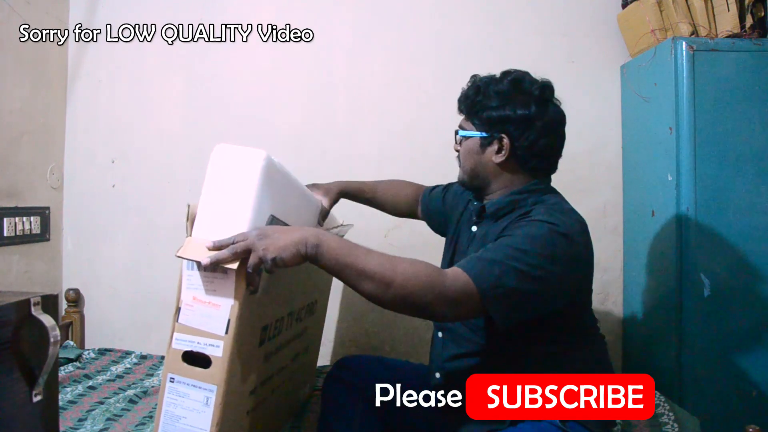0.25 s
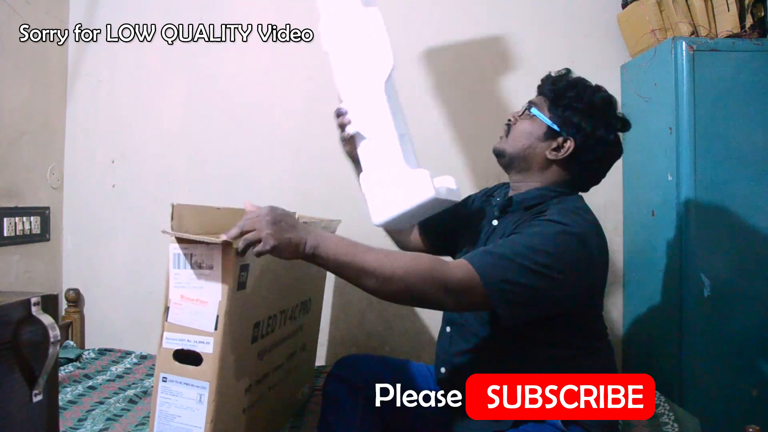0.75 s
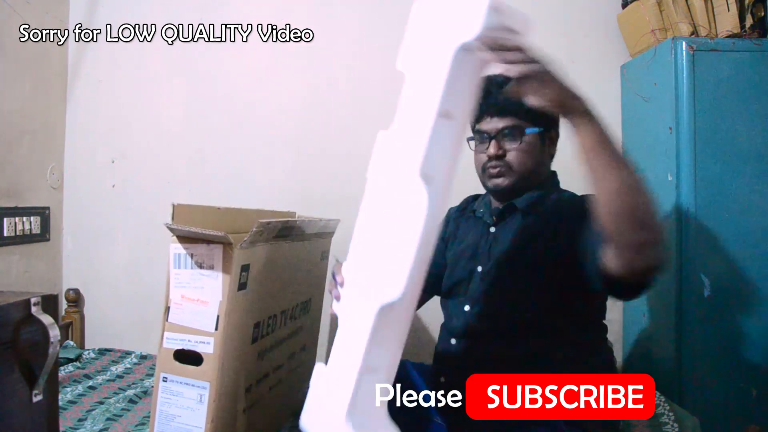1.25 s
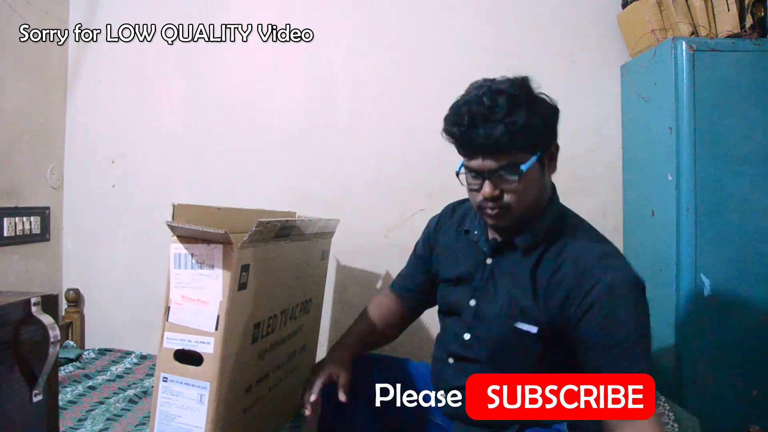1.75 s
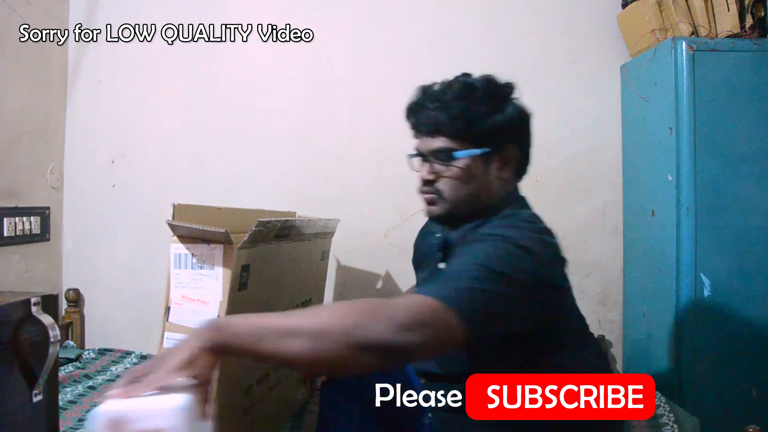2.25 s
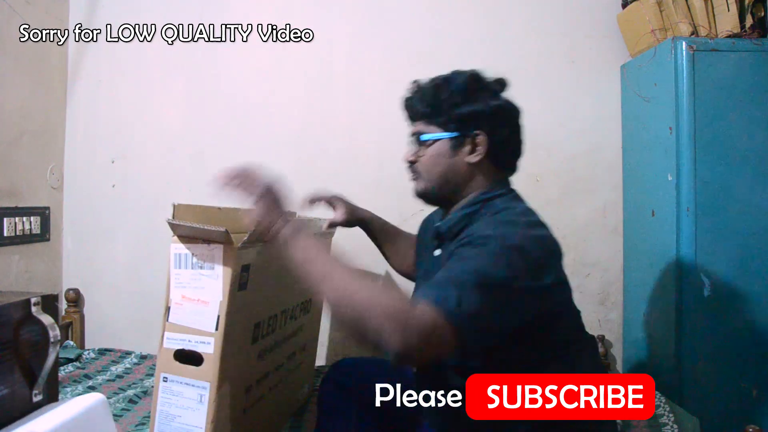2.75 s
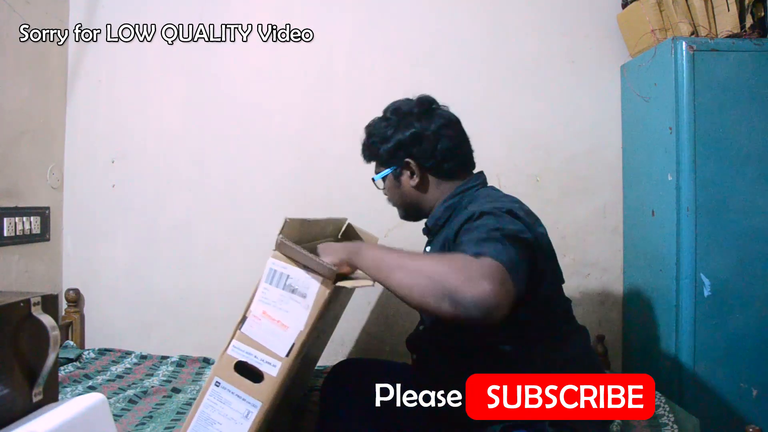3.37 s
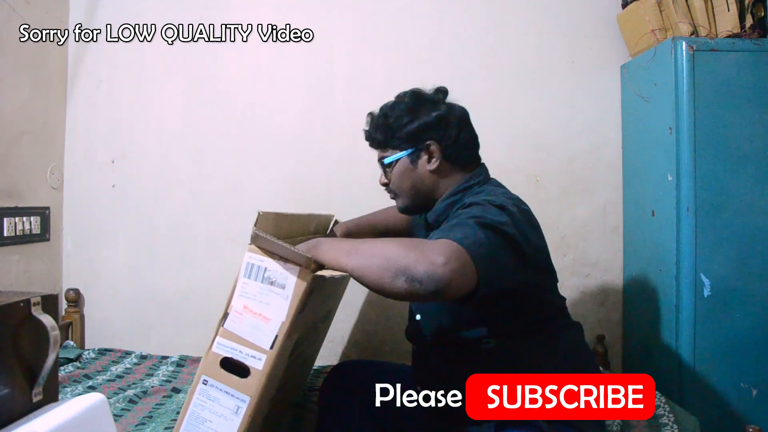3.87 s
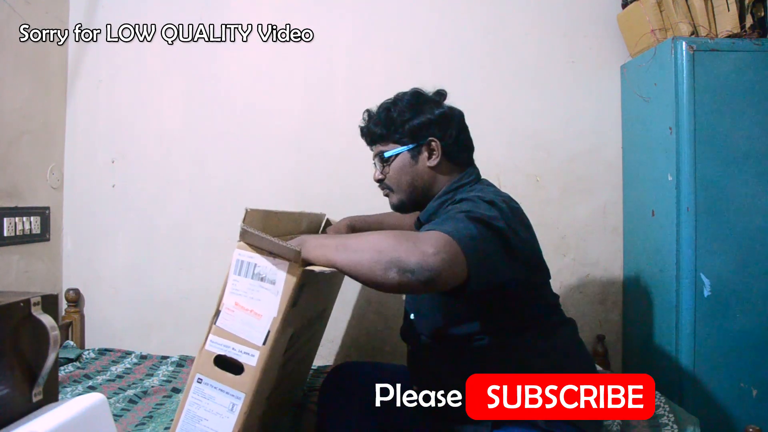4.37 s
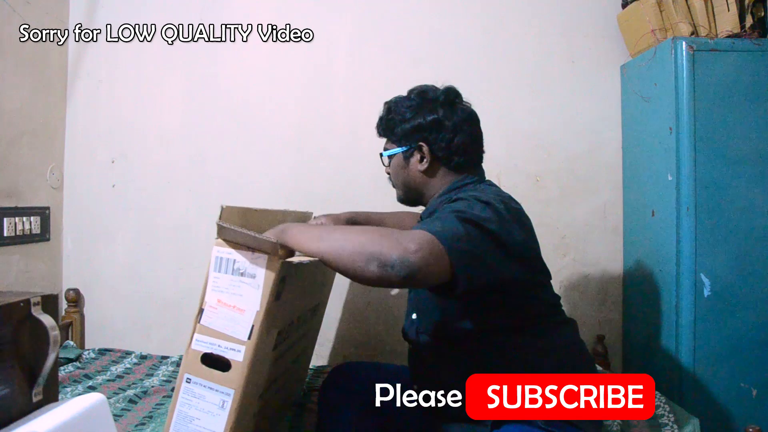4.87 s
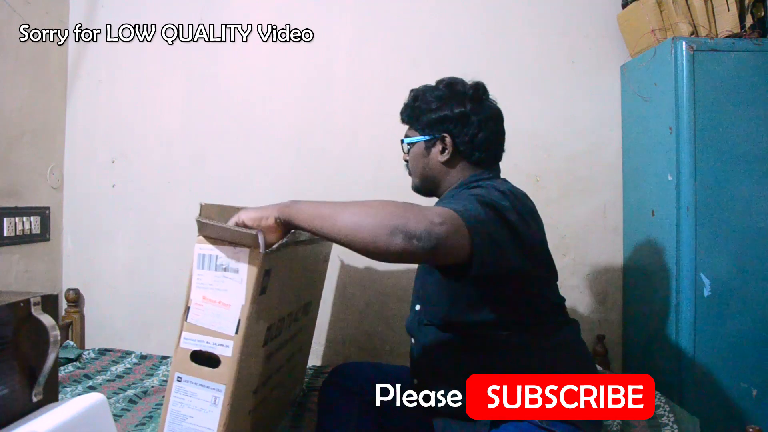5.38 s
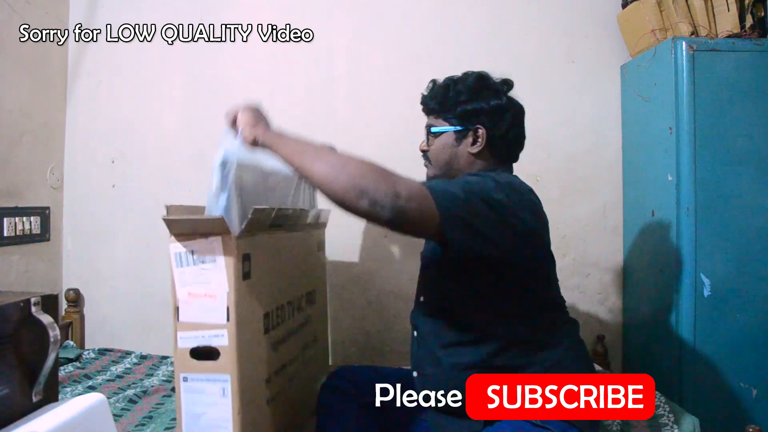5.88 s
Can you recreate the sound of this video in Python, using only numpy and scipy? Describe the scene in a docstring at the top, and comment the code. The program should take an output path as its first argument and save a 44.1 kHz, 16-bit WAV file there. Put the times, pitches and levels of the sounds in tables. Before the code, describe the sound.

Nearby microphone, short indoor reverberation, faint room air. First come grainy foam slides with light, woody-sounding knocks, a squeal of skin on foam, and one explosive crack that distorts. After a final foam knock, cardboard flaps brush and click sparsely. Then packing sheet is crumpled and pulled in overlapping, crisp swishes over dull carton bumps, easing off as the box drops softly back onto bedding.

```python
"""A small bedroom, miked from nearby: a long polystyrene foam block is dragged out of a cardboard carton,
slid through the hands, knocked and set down. Then the carton is tipped and a thin foam wrapping sheet is
crumpled and pulled up out of it. Rubbing is filtered slips and hiss, blows are ringing modes with noise,
snaps and crinkles are noise bursts and the hand's squeal is a gliding tone. The hardest knocks overload
the microphone."""
import sys
import numpy as np
from scipy import signal
from scipy.fft import rfft, irfft
from scipy.io import wavfile
from scipy.ndimage import uniform_filter1d

SR = 44100
rng = np.random.default_rng(int(sys.argv[2]) if len(sys.argv) > 2 else 0)


def store_wav(level_fs):
    """Save 16-bit WAV to argv[1]."""
    pcm = np.round(np.clip(np.atleast_2d(level_fs), -1, 1) * 32767)
    wavfile.write(sys.argv[1], SR, pcm.T.astype(np.int16))


N = 270333
TIME = np.arange(N) / SR
TOP_HZ = 16000  # top of the microphone's range


def undb(db):
    """Decibels to gain."""
    return 10 ** (np.asarray(db) / 20)


def unit(x):
    """Scale to rms 1."""
    return x / np.sqrt(np.mean(x ** 2))


def noise(count=N):
    """White noise."""
    return rng.standard_normal(count)


def curve(rows, axis=1):
    """A column of a table as a line through time."""
    rows = np.array(rows)
    return np.interp(TIME, rows[:, 0], rows[:, axis])


def band(x, lo_hz, hi_hz, order=2):
    """Band-pass made of a high-pass and a low-pass."""
    for hz, kind in ((lo_hz, "high"), (hi_hz, "low")):
        sos = signal.butter(order, min(hz, SR / 2 - 100), kind, fs=SR, output="sos")
        x = signal.sosfilt(sos, x)
    return x


def colour(x, points):
    """Causal filter with the given (f/Hz, level/dB) shape, made minimum-phase through the cepstrum."""
    hz, db = np.transpose(points)
    size = 2048
    bins_hz = np.arange(size // 2 + 1) * SR / size
    gain = undb(np.interp(np.log(bins_hz + 1), np.log(hz), db))
    cepstrum = irfft(np.log(gain))[:size // 2]
    cepstrum[1:] *= 2
    impulse = irfft(np.exp(rfft(cepstrum, size)))
    return signal.fftconvolve(x, impulse)[:len(x)]


def walk(rate):
    """Smooth random wander with a spread near 1, heading for a new value `rate` times a second."""
    hold = int(SR / rate)
    steps = np.repeat(noise(N // hold + 1), hold)
    return unit(uniform_filter1d(steps, hold))[:N]


def fade(t, t60):
    """Exponential decay that loses 60 dB in t60."""
    return np.exp(-np.log(1000) * t / t60)


def add(track, s, sound):
    """Mix a sound in at time s."""
    start = int(s * SR)
    track[start:start + len(sound)] += sound[:N - start]


# Quiet room: f/Hz, level/dB
ROOM_TONE = [(25, -15), (60, -9.5), (150, -6.5), (400, -2), (800, -5), (2500, -12), (8000, -28),
             (16000, -27)]


def room_tone(level_db=-47):
    """The air of the quiet room: steady noise, strongest in the low middle."""
    return unit(colour(noise(), ROOM_TONE)) * undb(level_db)


def room(x, count=40):
    """Reverberation of the small furnished room; the echo pattern keeps changing as things move about."""
    low_t60, high_t60, gap_s = .3, .26, .004
    out, t = np.zeros(N), TIME[:SR // 3]
    step = N // count + 1
    for start in range(0, N, step):
        low, high = rng.standard_normal((2, len(t)))
        low_tail = band(low, 72, 4100) * fade(t, low_t60)
        high_tail = band(high, 1700, 10400) * fade(t, high_t60)
        tail = (low_tail + 1.14 * high_tail) * (t > gap_s)
        tail = tail / np.sqrt(np.sum(tail ** 2))
        add(out, start / SR, signal.fftconvolve(x[start:start + step], tail))
    return out


# The carton drops back upright on the bedding: t/s, level/dB
SETTLE = [(5.8, -76), (5.88, -55), (5.925, -33.5), (5.97, -54), (6.13, -47)]


def settle():
    """The soft landing is a swell of low noise."""
    return unit(band(noise(), 40, 220)) * undb(curve(SETTLE))


def pop(t, hz, cycles):
    """A few cycles at one pitch that swell and die."""
    decay_s = cycles / hz
    rise_s = 0.53 * decay_s
    return np.sin(2 * np.pi * hz * t) * np.minimum(t / rise_s, 1) * np.exp(-np.maximum(t - rise_s, 0) / decay_s)


# Short pops and thuds: t/s, level/dB before the swell, f/Hz, decay/cycles, room send/gain before its trim
POPS = [(0.8898, -15, 474, 0.71, 0.088), (0.8912, -8.5, 2870, 0.53, 0.17), (1.877, -9.5, 89, .4, .1),
        (2.8405, -7.5, 1894, 4.6, 0.16), (4.9115, -10, 738, 3.7, 0.28), (5.5095, -10.5, 1720, 5.3, 0.45)]


def pops():
    """An edge lets go or lands with a pop, and the room answers."""
    direct, sent = np.zeros(N), np.zeros(N)
    for s, db, hz, cycles, share in POPS:
        sound = undb(db) * pop(TIME[:SR // 8], hz, cycles)
        add(direct, s, sound)
        add(sent, s, share * sound)
    return direct + undb(-2) * room(sent)


def strokes(rows, attack_s, release_t60, body_db, fizz_db, body_tilt):
    """Body, rasp and fizz gains: strokes take hold, swell or ease, then die; brightness trades body for fizz."""
    power = np.zeros((3, N))
    for s, length, db, swell_db, bright_db in rows:
        t = TIME - s
        progress = np.clip(t / length, 0, 1)
        attack = np.clip(t / attack_s, 0, 1)
        release = fade(np.maximum(t - length, 0), release_t60)
        gain = attack * undb(db + swell_db * (progress - .5)) * release
        balance = undb([body_db - body_tilt * bright_db, 0, fizz_db + bright_db])
        power += np.outer(balance, gain) ** 2
    return np.sqrt(power)


def rubbing(gains, shape, rate, spread_db, judder_db, hiss, wet, patchy_db, judder_rate=140, patchy_rate=110):
    """Tiny slips come in juddering bunches over a smooth hiss; body, rasp and fizz follow the contact."""
    sizes = undb(spread_db * np.minimum(rng.exponential(size=N), 4))
    slips = unit((rng.random(N) < rate / SR) * sizes * rng.choice([-1, 1], N))
    force = (slips + hiss * noise()) * undb(judder_db * walk(judder_rate))
    # the hand pulls evenly over many slips
    force = force / np.sqrt(uniform_filter1d(force ** 2, SR // 20))
    # every patch of surface rings at its own pitch, so the octaves swell separately
    octaves_hz = 2. ** np.arange(5, 15)
    direct = unit(sum(band(force, hz, 2 * hz, order=3) * undb(patchy_db * walk(patchy_rate)) for hz in octaves_hz))
    # slips from ever new places blur into a diffuse wash in the room
    wash_power = signal.fftconvolve(force ** 2, fade(TIME[:SR // 4], 0.037))[:N]
    wash = unit(np.sqrt(np.abs(wash_power)) * noise())
    sound = colour(direct + wet * wash, shape)
    edges_hz = (30, 1200, 5500, 16500)  # between them: body, rasp, fizz
    parts = [unit(band(sound, lo, hi, order=5)) for lo, hi in zip(edges_hz, edges_hz[1:])]
    return sum(part * gain for part, gain in zip(parts, gains))


# Tone of the thin flaps, also worn by snaps and crinkles: f/Hz, level/dB
FLAP_COLOUR = [(60, -8), (200, -8), (400, -2.5), (1300, 3.5), (2300, 5), (3900, 3), (6000, -6.5),
               (11300, -11.5), (14500, -7.5)]
# Fingers and block brushing the flaps: t/s, length/s, mid-stroke rasp level/dB, swell/dB, brightness/dB
FLAP_STROKES = [(0.214, 0.013, -32, 10, 5), (0.607, 0.014, -37, -4.5, 15), (2.833, 0.017, -40.5, -1, 7),
                (2.937, 0.058, -36.5, 12, -1), (3.033, 0.019, -28.5, 0, 4), (3.065, 0.06, -34.5, 5, 0),
                (3.15, 0.17, -42.5, 7, -0.5), (3.32, 0.11, -45.5, 2, 7.5), (3.475, 0.14, -36, -1.5, -1),
                (3.598, 0.024, -29.5, 16.5, -2.5), (3.714, 0.014, -35.5, -2.5, 9.5)]


def flap_brushes():
    """Brushed flaps make sparse, uneven slips; returns the sound and the rasp gain."""
    gains = strokes(FLAP_STROKES, attack_s=0.0058, release_t60=0.15, body_db=-10, fizz_db=-5.5, body_tilt=0.14)
    sound = rubbing(gains, FLAP_COLOUR, rate=1700, spread_db=4.0, judder_db=1.1, hiss=0.68, wet=0.48,
                    patchy_db=4.0)
    return sound, gains[1]


# A finger drags along a flap edge: t/s, length/s, level at the middle/dB
EDGE_DRAGS = [(3.31, 0.14, -35.5), (4.518, 0.14, -24.5)]


def edge_drags():
    """The card edge gives a papery hiss in a narrow band; each drag swells and fades."""
    gain = 0
    for s, length, db in EDGE_DRAGS:
        gain = gain + undb(db) * np.sin(np.pi * np.clip((TIME - s) / length, 0, 1))
    return gain * unit(band(noise(), 3500, 4900, order=4) * undb(2.5 * walk(400)))


# Sharp snaps, creases buckling and the clicks of the hardest knocks: t/s, level/dB, centre f/Hz
SNAPS = [(0.3845, -5.5, 3780), (0.675, -16, 3500), (1.214, -17, 3000), (1.8771, 0.5, 4950),
         (3.093, -21, 6500), (3.189, -22, 4460), (3.419, -34, 5000), (3.432, -16.5, 3920),
         (3.4845, -17, 4830), (3.533, -25, 6000), (3.5496, -17, 5800), (3.582, -21, 4050),
         (4.444, -14, 6000), (4.554, -12, 4470), (4.585, -13, 4000), (4.628, -7.5, 3800),
         (4.862, -12, 9900), (5.104, -15.5, 3500), (5.821, -20, 9900), (6.042, -18, 2450)]


def snaps(decay_s=0.0012):
    """A sharp snap or click is a spiky noise burst with the bright tone of the thin flaps."""
    out, t = np.zeros(N), TIME[:SR // 8]
    shape = np.exp(-t / decay_s)
    for s, db, hz in SNAPS:
        burst = colour(band(noise(len(t)) * shape, hz / 2, 2 * hz, order=1), FLAP_COLOUR)
        # every burst gets the energy of the bare decay
        add(out, s, undb(db) * burst * np.sqrt(np.sum(shape ** 2) / np.sum(burst ** 2)))
    return out


def crinkles(gain, rate, db, lo_hz, decay_s):
    """Small creases give way at random, as loud as the stroke that bends them."""
    onsets = (rng.random(N) < rate / SR) * rng.random(N) ** 2
    power = signal.fftconvolve(onsets, np.exp(-2 * TIME[:SR // 20] / decay_s))[:N]
    hiss = unit(colour(band(noise(), lo_hz, TOP_HZ, order=1), FLAP_COLOUR))
    return undb(db) * gain * np.sqrt(np.abs(power)) * hiss


# Tone of the rubbed wrapping sheet: f/Hz, level/dB
WRAP_COLOUR = [(50, -39), (130, -14.5), (280, -11), (390, -2.5), (700, -1.5), (1550, 1), (2600, -0.5),
               (4500, -3), (8000, -7.5), (11300, -9.5), (15000, -13.5)]
# Tugs at the sheet: t/s, length/s, mid-tug rasp level/dB, swell/dB, brightness/dB
WRAP_TUGS = [(3.825, 0.21, -33.5, 6.5, 5), (3.87, 0.035, -29.5, 7, -16), (4.05, 0.12, -25, -2.5, 3.5),
             (4.18, .21, -31.5, 4, -1.5), (4.285, .06, -27.5, -7, -1), (4.39, 0.12, -26, 2.5, -2),
             (4.52, 0.15, -24.5, -3, 1.5), (4.68, 0.59, -26.5, 5, 1), (5.228, 0.055, -29, 7, 0),
             (5.285, 0.18, -24.5, 5, -1.5), (5.47, 0.098, -25.5, -1.5, 0.5), (5.555, 0.41, -29, 0, -3.5),
             (5.82, 0.07, -33.5, 11, -38), (5.96, 0.16, -38.5, 0, 1)]


def wrap_tugs():
    """The tugged sheet rubs in dense, uneven slips; returns the sound and the rasp gain."""
    gains = strokes(WRAP_TUGS, attack_s=0.015, release_t60=0.095, body_db=-11, fizz_db=-9.5, body_tilt=0.27)
    sound = rubbing(gains, WRAP_COLOUR, rate=4400, spread_db=4.0, judder_db=-1.5, hiss=0.48, wet=1.0,
                    patchy_db=3.6)
    return sound, gains[1]


def knocks(rows, modes, rattle_db, rattle_t60, crack_db, crack_t60, spot_db, spot_cycles):
    """A blow pops the spot, rings the modes, cracks and rattles overtones; lower-pitched spots sound duller."""
    out, t = np.zeros(N), TIME[:SR // 2]
    for s, db, spot_hz, lo_hz, length in rows:
        hi_hz = 1.3 * spot_hz  # the blow turns dull above this
        ring = 0
        for k, (hz, mode_db, t60) in enumerate(modes):
            ring = ring + (-1) ** k * undb(mode_db) * np.sin(2 * np.pi * hz * t) * fade(t, t60 * length)
        ring = ring / np.sqrt(sum(undb(mode_db) ** 2 for _, mode_db, _ in modes))
        rattle = undb(rattle_db) * fade(t, rattle_t60 * length)
        crack = undb(crack_db) * fade(t, crack_t60)
        blow = ring / 2 + (rattle + crack) * noise(len(t))
        body = band(band(blow, lo_hz / 2, hi_hz, order=1), lo_hz / 2, 2 * hi_hz, order=4)
        add(out, s, undb(db) * (body + undb(spot_db) * pop(t, spot_hz, spot_cycles)))
    return out


# Bumps on the carton: t/s, drive level/dB, struck spot f/Hz, twice the low-cut f/Hz, ring length factor
CARTON_BUMPS = [(0.0895, -13.5, 950, 171, 0.85), (0.612, -15.5, 900, 202, 0.35),
                (1.4635, -17, 770, 130, 0.64), (2.094, -22, 280, 132, 0.74), (2.552, -24, 560, 100, 3),
                (2.64, -24.5, 560, 130, 1.6), (2.838, -19.5, 1190, 400, 0.57), (2.872, -25, 440, 131, 0.88),
                (3.432, -25.5, 1660, 390, 0.81), (3.718, -10, 935, 190, 0.49),
                (3.882, -17.5, 900, 350, 0.37), (3.9765, -15.5, 1660, 253, 0.45),
                (4.060, -19, 398, 130, 0.88), (4.643, -13.5, 560, 280, 0.73), (4.863, -16, 473, 169, 0.5),
                (4.895, -11.5, 600, 506, 0.96), (5.858, -14, 800, 1100, 3.9)]
# Modes of the carton: f/Hz, relative level/dB, t60/s before the ring length factor
CARTON_MODES = [(124, -30, 0.68), (196, 10.5, 0.14), (256, 11.5, 0.049), (356, 9.5, 0.34), (510, 1, 0.054),
                (610, 0, 0.12), (772, 6.5, 0.26), (947, 20.5, 0.039)]


def carton_bumps():
    """The hollow carton rings low, with a short pop at the struck spot."""
    return knocks(CARTON_BUMPS, CARTON_MODES, rattle_db=-0.5, rattle_t60=0.27, crack_db=-0.5,
                  crack_t60=0.043, spot_db=-10, spot_cycles=1.3)


# A hand sliding along the block: t/s, f/Hz, tone level/dB
SQUEAL = [(1.0, 5500, -61), (1.027, 5770, -32), (1.05, 6300, -35), (1.09, 6840, -28.5),
          (1.125, 6860, -25.5), (1.155, 6800, -23), (1.18, 6400, -26.5), (1.21, 5140, -32),
          (1.24, 4930, -66)]


def squeal(jitter=0.07, hiss_db=1, flutter_db=3):
    """Skin sticks and slips on the beads: an unsteady pitch follows the hand's speed, under a fine hiss."""
    pitch_hz = curve(SQUEAL, axis=1)
    phase = 2 * np.pi * np.cumsum(pitch_hz * (1 + jitter * walk(2200))) / SR
    tone = unit(np.sin(phase) * undb(flutter_db * walk(300)))
    hiss = unit(band(noise(), 7500, 10500) + band(noise(), 12500, 16000))
    speed = pitch_hz / pitch_hz.max()  # the sixth power keeps the hiss near full speed
    return (tone + undb(hiss_db) * speed ** 6 * hiss) * undb(curve(SQUEAL, axis=2))


# Tone of the rubbed foam block: f/Hz, level/dB
BLOCK_COLOUR = [(50, -6.5), (120, -4), (200, -5.5), (430, 1.5), (750, 4), (1700, 0.5), (3500, -2.5),
                (5800, -13), (8100, -12.5), (11500, -13.5), (15500, -17)]
# Slides over card, hands and shirt: t/s, length/s, mid-slide rasp level/dB, swell/dB, brightness/dB
BLOCK_SLIDES = [(0.0, 0.013, -17, -30.5, -2.5), (0.08, 0.34, -34, 1, 1.5), (0.32, 0.066, -25.5, 15.5, -6),
                (0.485, 0.089, -33.5, -10, -4), (0.61, .19, -33, -1.5, -3.5), (0.97, 0.034, -30, -16, -6.5),
                (1.02, 0.42, -31.5, 3, 1.5), (1.46, 0.097, -26, 1, 1), (1.56, .42, -29, -5.5, 3),
                (2.005, .11, -27.5, -8, -2.5), (2.175, 0.16, -32.5, -5.5, -1.5),
                (2.34, 0.045, -27.5, -16, -5.5), (2.38, 0.15, -51.5, -12, 12),
                (2.55, .15, -48.5, 12, -14.5)]


def block_slides():
    """The sliding block rubs in dense, nearly equal slips."""
    gains = strokes(BLOCK_SLIDES, attack_s=0.028, release_t60=0.22, body_db=-8.5, fizz_db=-9, body_tilt=0.6)
    return rubbing(gains, BLOCK_COLOUR, rate=4000, spread_db=-1.5, judder_db=-0.05, hiss=0.59, wet=1.0,
                   patchy_db=3.0)


# Knocks on the block: t/s, drive level/dB, struck spot f/Hz, twice the low-cut f/Hz, ring length factor
BLOCK_KNOCKS = [(0.2645, -15.5, 2000, 397, 0.22), (0.3835, -1.5, 1620, 300, 0.42),
                (0.403, -15, 2060, 700, 0.16), (0.581, -20.5, 1605, 1400, 0.35),
                (1.214, -0.5, 1526, 207, 0.38), (1.270, -13, 1500, 1400, .45),
                (1.322, -13.5, 1800, 1950, 0.46), (1.8765, 7, 929, 900, 1.08),
                (2.226, -21.5, 1840, 1300, .4), (2.3885, -2.5, 1220, 505, 0.82)]
# Modes of the block: f/Hz, relative level/dB, t60/s before the ring length factor
BLOCK_MODES = [(195.6, 7, 0.3), (274, -2, 0.103), (378, -12, 0.091), (488, -16, 0.96), (565, 3.5, 0.3),
               (804, 11, 0.081), (897, -4, 0.22), (1060, 5, 0.19), (1250, 12, 0.19), (1340, -1, 0.6),
               (1485, 8.5, 0.16), (1960, -11, 0.29), (2440, -10, 0.24)]


def block_knocks():
    """The light foam rings through the middle, with a strong pitched pop at the struck spot."""
    return knocks(BLOCK_KNOCKS, BLOCK_MODES, rattle_db=-3.0, rattle_t60=0.26, crack_db=1.5,
                  crack_t60=0.043, spot_db=-2.5, spot_cycles=6.9)


def scene():
    """The quiet bedroom, carton, wrapping sheet and foam block, with the room's echoes of blows and bright sounds."""
    flaps, flap_gain = flap_brushes()
    wrap, wrap_gain = wrap_tugs()
    flap_creases = crinkles(flap_gain, rate=80, db=-4, lo_hz=3000, decay_s=0.00059)
    wrap_creases = crinkles(wrap_gain, rate=120, db=8, lo_hz=6000, decay_s=0.0016)
    bright = snaps() + squeal() + edge_drags() + flap_creases + wrap_creases
    carton = carton_bumps()
    foam = block_knocks()
    echoes = room(undb(-13.5) * foam + undb(-20.5) * carton + undb(-29) * bright)
    background = room_tone() + echoes + settle() + pops()
    return (background + flaps + wrap + carton + bright + block_slides() + foam)[None]


def record(dry):
    """The nearby microphone has a narrow dip in the treble and clips on the hardest knocks; the top is cut."""
    dip_hz, dip_q, dip_depth = 11400, 8, .7  # a depth of 1 would be a full notch
    notched = signal.lfilter(*signal.iirnotch(dip_hz, dip_q, fs=SR), dry)
    clipped = np.clip(dry + dip_depth * (notched - dry), -1, 1)
    return signal.sosfilt(signal.ellip(10, .2, 70, TOP_HZ, fs=SR, output="sos"), clipped)


dry = scene()
out = record(dry)
store_wav(out)
```